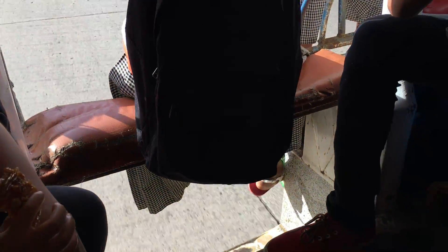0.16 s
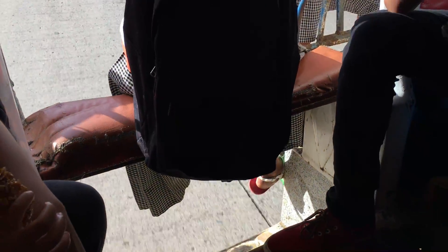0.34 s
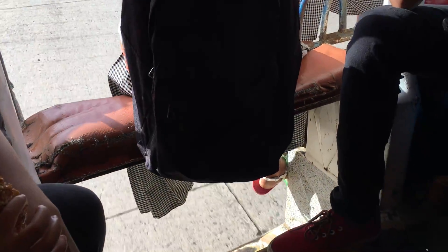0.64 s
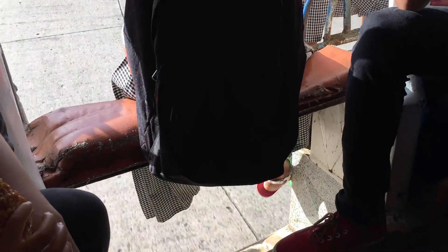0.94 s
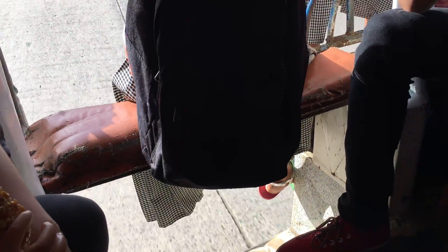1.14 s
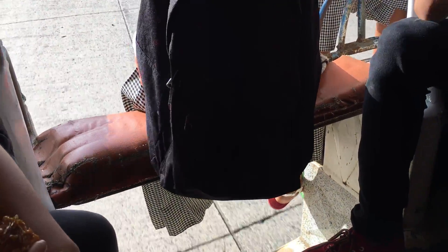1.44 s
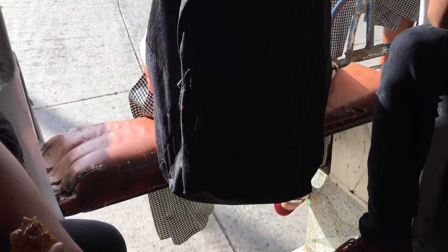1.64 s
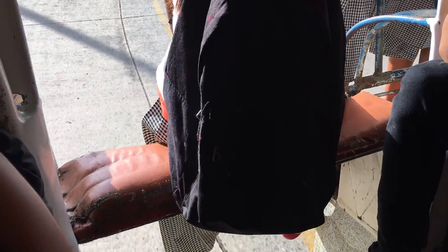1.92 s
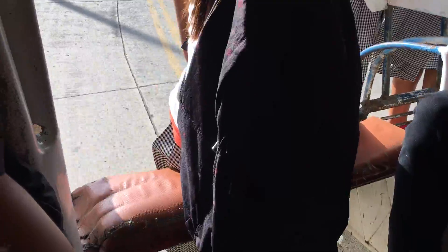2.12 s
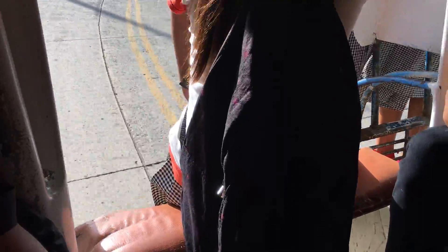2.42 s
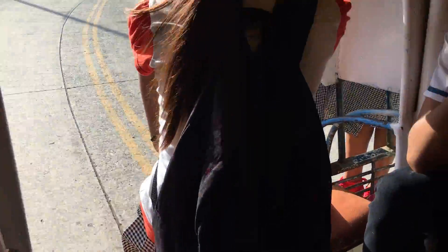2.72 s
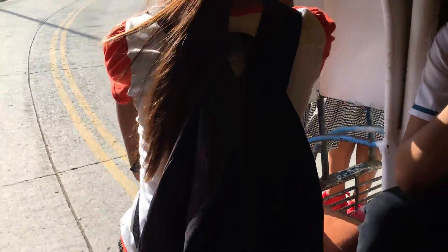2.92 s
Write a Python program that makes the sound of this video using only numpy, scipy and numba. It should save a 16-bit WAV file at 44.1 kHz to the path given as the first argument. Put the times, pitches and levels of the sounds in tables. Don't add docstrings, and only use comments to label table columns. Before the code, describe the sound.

A diesel bus engine holds constant speed, heard inside the open-sided cabin: a deep, wavering drone near 59 Hz over low tyre and air rush. Until 1.6 s knock is soft, with faint ticks and tiny dry seat-frame squeaks, clearest at 0.7 and 0.83 s. Floor thuds come around 1.6-1.75 s, then load brings loud, rapid metallic knocking, strongest 1.9-2.4 s, easing around 2.7 s but continuing to the end at 3.07 s.

```python
import sys
import numpy as np
from scipy import signal
from scipy.fft import rfft, irfft, next_fast_len
from scipy.io import wavfile
from scipy.ndimage import uniform_filter1d
from numba import njit

SR = 44100
rng = np.random.default_rng(int(sys.argv[2]) if len(sys.argv) > 2 else 0)


def magnitude_from_level(level_db):
    exponent = np.asarray(level_db, float) / 20
    return 10 ** exponent


def persist_wave(psi):
    counts = np.round(np.clip(psi, -1, 1) * 32767).astype(np.int16)
    wavfile.write(sys.argv[1], SR, np.atleast_2d(counts).T)


N = 135387

CYCLE_HZ, FIRST_FIRES_S = 14.66, 2.2185
FULL_LOAD_DB = -30

# t/s, firing-tone boom level/dB, engine load as knock level/dB
DRIVE = [(0, -25.5, -40), (.1, -20.5, -41), (.25, -12.5, -51), (.44, -19, -42.5), (0.629, -11.5, -53),
         (0.779, -15, -54), (1.14, -16, -41.5), (1.29, -19, -41), (1.37, -15, -41), (1.68, -22.5, -35),
         (1.8, -18, -33), (1.93, -9.5, -30), (2.08, -12, -30.5), (2.298, -12, -31), (2.55, -14.5, -32.5),
         (2.7, -19.5, -36), (2.85, -17, -36), (3.07, -12.5, -32.5)]
# multiple of the cycle, level at full load/dB, share of load change
ENGINE_ORDERS = [(6, -28.5, 2.4), (8, -17.5, 1.21), (10, -26.5, 1.66), (12, -29, 1.4), (14, -38, 1.87),
                 (20, -50.5, 2.7)]
CYLINDER_DB = [0, -2, -2, -5.5]
# t/s, extra level/dB
ODD_FIRINGS = [(1.885, -1.5), (1.953, 2), (2.09, -0.5), (2.158, -1), (2.293, 2.5), (2.361, 2), (2.497, -1),
               (2.702, 3), (2.77, 1), (2.838, -3.5), (2.94, 1.5), (3.043, 2)]
# f/Hz, width/Hz, level/dB
BLOCK_MODES = [(695.7, 20, 2.5), (994, 52, -3.5), (1121, 15, 0), (1621, 104, -5), (1917, 63, -3.5),
               (2278, 8.1, -1), (2475, 59, -11.5), (2787, 69, -9.5), (3232, 172, -12), (3585, 34, -10),
               (4520, 120, -19.5)]
# f/Hz, level/dB
KNOCK_COLOUR = [(300, -33), (560, -16), (700, -9), (1010, 1), (1380, -7.5), (3000, -13.5), (5000, -20.5),
                (9000, -35), (16000, -54)]
# t/s, level/dB
SHAKE = [(0, -34), (.3, -31.5), (.7, -39), (1.05, -29.5), (1.349, -25.5), (1.6, -29), (1.9, -23.5),
         (2.1, -26.5), (2.599, -37), (3.07, -30.5)]
# f/Hz, width/Hz, level/dB
FLOOR_PANELS = [(47.9, 9.3, 4), (68, 56.7, 7), (113, 39, -5.5), (146, 52, -12.5), (275.5, 160, -11.5)]
PANEL_FOLLOW = [1.3, 0.13, 0.56, 0.084, 0.98]
# f/Hz, level/dB
ROAD_COLOUR = [(110, -47), (210, 0.5), (355, -2), (560, -7), (2600, -18), (4560, -30), (10400, -43),
               (16000, -37)]
# t/s, length/s, level/dB, stick-slip f/Hz, tone share/0-1
SQUEAKS = [(.003, 0.01, -66, 3100, .2), (.049, 0.011, -53.5, 3000, 0.3), (.2935, 0.012, -47, 3670, 0.2),
           (0.322, 0.021, -56.5, 3840, .3), (0.34, 0.026, -49, 3800, 0.3), (0.376, 0.03, -52.5, 3750, .1),
           (0.458, .01, -59.5, 3840, 0.1), (0.525, .03, -66, 3970, 0.4), (0.687, 0.014, -52, 2820, 0.3),
           (.7015, 0.0087, -40.5, 3750, 0.83), (0.709, .014, -47, 3860, .4),
           (0.8243, 0.008, -40.5, 3810, 0.8), (0.833, 0.03, -48.5, 3580, 0.1),
           (1.034, 0.014, -52.5, 2920, .05), (1.219, 0.012, -50.5, 3170, 0.05),
           (1.444, 0.01, -52.5, 1980, .05), (1.478, 0.043, -53.5, 2090, 0.05),
           (1.537, 0.012, -56, 4120, 0.5), (1.542, .01, -58, 4000, .05)]
SQUEAK_PARTIALS_DB = [-8, -14, 0, -4]
RASP_HZ = [4400, 5500, 6700, 9000, 9800, 11400, 13000, 15200]
# t/s, length/s, f/Hz, level/dB
JOINTS = [
    (0.143, .06, 190, -39),
    (0.265, .08, 320, -40.5),
    (0.382, .08, 138, -34),
    (0.524, .1, 328, -40.5),
    (1.268, 0.13, 261, -35.5),
    (1.58, 0.045, 127.6, -27),
    (1.72, 0.056, 55.4, -24),
    (1.7, .14, 330, -38.5),
    (1.736, .1, 453, -42),
    (2.05, 0.05, 293, -36),
]
# t/s, length/s, f/Hz, level/dB
FRAME_RINGS = [(0.292, 0.008, 5230.0, -59.0), (0.292, 0.008, 7260, -57), (0.356, 0.006, 6500.0, -62.0),
               (0.701, 0.01, 7410.0, -60), (0.701, 0.016, 4520.0, -59.0), (0.705, 0.0087, 3830, -49),
               (0.705, 0.012, 7060.0, -62.0), (0.711, 0.008, 5710.0, -62.0), (0.827, 0.015, 3800, -46.5),
               (0.828, 0.016, 3480, -47), (0.833, 0.009, 7030, -45), (0.843, 0.006, 5810.0, -54),
               (0.846, 0.01, 5230.0, -61), (1.035, 0.012, 5460, -58), (1.041, 0.008, 6740.0, -63.0),
               (1.042, 0.008, 9000, -65), (1.224, 0.006, 9490, -60), (1.219, 0.007, 2610, -45),
               (1.23, 0.0046, 2700, -47), (1.45, 0.006, 7060.0, -60), (1.475, 0.01, 6240.0, -59),
               (1.502, 0.008, 6240.0, -61.0)]
# t/s, length/s, f/Hz, level/dB
PANEL_RINGS = [(1.741, 0.008, 4130.0, -51.0), (1.809, 0.008, 6160.0, -58.0), (1.845, 0.011, 1024, -26),
               (1.941, 0.0087, 3230, -36), (1.981, 0.008, 990.0, -27), (2.012, 0.013, 2290, -33),
               (2.014, 0.0071, 7360.0, -52), (2.016, 0.0071, 985, -33.0), (2.147, 0.008, 3230.0, -35),
               (2.166, 0.009, 3250, -39), (2.218, 0.0084, 1000, -31), (2.216, 0.01, 1585, -28),
               (2.251, 0.006, 3250.0, -36.5), (2.286, 0.0065, 4680, -46), (2.29, 0.008, 692, -28.5),
               (2.323, 0.006, 1953, -39), (2.357, 0.0089, 1516, -38), (2.362, 0.01, 3570.0, -43),
               (2.392, 0.012, 693, -38.5), (2.423, 0.01, 2930.0, -35.5), (2.425, 0.008, 980, -46),
               (2.455, 0.01, 2970, -41), (2.489, 0.006, 1980, -36), (2.488, 0.015, 3590, -40.5),
               (2.557, 0.0083, 1620, -38.0), (2.555, 0.01, 3200, -44.0), (2.661, 0.007, 993, -37),
               (2.696, 0.0047, 1002, -32), (2.761, 0.0073, 3250, -41), (2.797, 0.008, 1980.0, -38.5),
               (2.798, 0.007, 990, -39), (2.866, 0.01, 1890, -42), (2.92, 0.027, 2500, -40.5),
               (2.931, 0.01, 4610.0, -50), (2.93, 0.013, 1915, -36.5), (2.964, 0.01, 4690.0, -51),
               (2.965, 0.011, 3250.0, -41), (3.033, 0.008, 3226, -41), (3.036, 0.008, 4040, -45)]


def level(x, db):
    return x * magnitude_from_level(db) / np.sqrt(np.mean(x ** 2))


@njit
def svf(x, hz, width):
    y, band, low = np.empty(len(x)), 0., 0.
    g, k = np.tan(np.pi * hz / SR), width / hz
    for i in range(len(x)):
        v = (band + g * (x[i] - low)) / (1 + g * (g + k))
        band = 2 * v - band
        low = low + 2 * g * v
        y[i] = k * v
    return y


def band_noise(hz, width):
    return svf(rng.standard_normal(N), float(hz), float(width))


def walk(rate):
    hold = int(SR / rate)
    steps = np.repeat(rng.standard_normal(N // hold + 1), hold)[:N]
    return 1.5 * uniform_filter1d(uniform_filter1d(steps, hold), hold)


def colour(x, points):
    hz, db = np.array(points, float).T
    n = next_fast_len(N)
    f = np.maximum(np.arange(n // 2 + 1) * SR / n, 1)
    gain = magnitude_from_level(np.interp(np.log(f), np.log(hz), db))
    return irfft(rfft(x, n) * gain, n)[:N]


def boom(cycle, boom_db, load_db):
    pulse_lag_s, pulse_skew, phase_wobble = .0056, -.6, .22
    turn = 2 * np.pi * (cycle - pulse_lag_s * CYCLE_HZ)
    firing_gain = magnitude_from_level(boom_db + 1.4 * walk(18))
    out = firing_gain * np.cos(4 * turn + pulse_skew + phase_wobble * walk(14))
    light_load_db = .8 * np.minimum(load_db + 38, 0)
    for order, db, follow in ENGINE_ORDERS:
        order_db = db + follow * (load_db - FULL_LOAD_DB) + light_load_db
        gain = magnitude_from_level(order_db + 1.2 * walk(25.04))
        out += gain * np.cos(round(order) * turn + pulse_skew + phase_wobble * walk(15))
    return -np.sqrt(2) * out


def knock(cycle, load_db):
    lead_s, late_s, t60_s, crack_s = .003, .002, .22, .0045
    scatter_db, patch_db, crack_db, clatter_db = 1.24, 3.4, 2.5, -11
    knock_db, ring_db = -2.5, 2.5
    load = load_db - FULL_LOAD_DB
    common_db = scatter_db * rng.standard_normal(300)
    for s, db in ODD_FIRINGS:
        common_db[int(np.floor(4 * (s - FIRST_FIRES_S) * CYCLE_HZ))] = db

    def part(hz, width):
        turns = 4 * (cycle + (lead_s - late_s * rng.random()) * CYCLE_HZ)
        firing = np.floor(turns).astype(int)
        firing_db = common_db + patch_db * rng.standard_normal(300)
        size_db = np.array(CYLINDER_DB)[firing % 4] + firing_db[firing]
        age = (turns - firing) / (4 * CYCLE_HZ)
        fading = magnitude_from_level(size_db - 60 * age / t60_s + crack_db * np.exp(-age / crack_s))
        burst = np.hypot(fading, magnitude_from_level(clatter_db)) * rng.standard_normal(N)
        follow = 1.47 + .2 * np.log2(hz / 1000)
        return level(svf(burst, float(hz), float(width)), 0) * magnitude_from_level(follow * load)

    third_octaves = 400 * 2 ** np.arange(0, 5.5, 1 / 3)
    broad = sum(np.sqrt(hz / 1000) * part(hz, hz / 4) for hz in third_octaves)
    ring = sum(magnitude_from_level(db) * np.sqrt(width / 100) * part(hz, width) for hz, width, db in BLOCK_MODES)
    return magnitude_from_level(knock_db + FULL_LOAD_DB - 4) * (colour(broad, KNOCK_COLOUR) + magnitude_from_level(ring_db) * ring)


def floor_shake(shake_db):
    mean_db, out = -32, np.zeros(N)
    for (hz, width, db), follow in zip(FLOOR_PANELS, PANEL_FOLLOW):
        panel = svf(band_noise(hz, 1.23 * width), float(hz), 1.23 * width)
        out += level(panel, db + mean_db) * magnitude_from_level(follow * (shake_db - mean_db))
    return out


def road():
    rush, swell = np.zeros(N), walk(2.1)
    t = (np.arange(N) - N / 4) / SR
    for hz in 200 * 2 ** np.arange(0, 6.6, .5):
        fade_db = -1.5 * t * min(450 / hz, 1)
        db = .5 * swell + 1.6 * walk(8.95) + fade_db
        rush += magnitude_from_level(db) * band_noise(hz, hz / 2)
    whirr = magnitude_from_level(3.5 * walk(25)) * band_noise(2580, 200)
    return level(colour(rush, ROAD_COLOUR), -39.5) + level(whirr, -57)


def fittings():
    ticks_per_s, tick_db, scatter_db, decay_s, tick_hz = 30, -72, 4, .003, 7000
    struck = rng.random(N) < ticks_per_s / SR
    hits = struck * magnitude_from_level(tick_db + scatter_db * rng.exponential(size=N))
    env = signal.lfilter([1], [1, -np.exp(-1 / (decay_s * SR))], hits)
    return env * level(band_noise(tick_hz, tick_hz), 0)


def squeaks(t):
    attack_s, tail_s, wobble, fade_db = .0006, .003, .009, 8
    out, waver = np.zeros(N), walk(600)
    flutter = [magnitude_from_level(3.5 * walk(250)) for _ in SQUEAK_PARTIALS_DB]
    frame = np.array([level(band_noise(hz, 900), -5.5 * np.log2(hz / 8000)) for hz in RASP_HZ])
    rasp_mixes = magnitude_from_level(2 * rng.standard_normal((len(SQUEAKS), len(RASP_HZ))))
    for (t0, length, db, hz, share), rasp_mix in zip(SQUEAKS, rasp_mixes):
        i = slice(int(t0 * SR), int((t0 + length + .07) * SR))
        age = t[i] - t0
        share = np.clip(share, 0, 1)
        env = np.clip(age / attack_s, 0, 1) * np.exp(-np.maximum(age - length, 0) / tail_s)
        phase = 2 * np.pi * np.cumsum(hz * (1 + wobble * waver[i])) / SR
        stack = sum(magnitude_from_level(p) * flutter[k][i] * np.sin((k + 1) * phase)
                    for k, p in enumerate(SQUEAK_PARTIALS_DB))
        rasp = rasp_mix @ frame[:, i] / np.linalg.norm(rasp_mix)
        gain = magnitude_from_level(db - fade_db * np.clip(age / length, 0, 1)) * env
        out[i] += gain * (np.sqrt(share) * stack + np.sqrt(1 - share) * rasp)
    return out


def joints(t):
    q, edge_s = 4.8, .025
    out = np.zeros(N)
    for t0, length, hz, db in JOINTS:
        env = np.clip(np.minimum(t - t0, t0 + length - t) / edge_s + 1, 0, 1)
        hum = env * svf(band_noise(hz, hz / q), float(hz), hz / q)
        out += level(hum, db + 10 * np.log10(np.mean(env ** 2)))
    return out


def rings(t, table):
    attack_s, tail_s, wobble = .0015, .0035, .011
    out, waver, flutter = np.zeros(N), walk(600), magnitude_from_level(2.2 * walk(400))
    for t0, length, hz, db in table:
        i = slice(int(t0 * SR), int((t0 + length + .04) * SR))
        age = t[i] - t0
        env = np.clip(age / attack_s, 0, 1) * np.exp(-np.maximum(age - length, 0) / tail_s)
        phase = 2 * np.pi * np.cumsum(hz * (1 + wobble * waver[i])) / SR
        out[i] += np.sqrt(2) * magnitude_from_level(db) * env * flutter[i] * np.sin(phase)
    return out


def scene():
    t = np.arange(N) / SR
    drive_t, drive_boom, drive_load = np.array(DRIVE, float).T
    boom_db = np.interp(t, drive_t, drive_boom)
    load_db = np.interp(t, drive_t, drive_load)
    shake_db = np.interp(t, *np.array(SHAKE, float).T)
    cycle = (t - FIRST_FIRES_S) * CYCLE_HZ
    engine = boom(cycle, boom_db, load_db) + knock(cycle, load_db)
    ride = floor_shake(shake_db) + road() + fittings()
    body = squeaks(t) + joints(t) + rings(t, FRAME_RINGS) + rings(t, PANEL_RINGS)
    return (engine + ride + body)[None]


def band_limit(x):
    return signal.sosfilt(signal.butter(12, 15830, fs=SR, output="sos"), x)


def record(dry):
    ceiling = .74
    bass_cut = signal.sosfilt(signal.butter(2, 32, "high", fs=SR, output="sos"), dry)
    limited = ceiling * np.cbrt(np.tanh((bass_cut / ceiling) ** 3))
    return band_limit(limited)


dry = scene()
out = record(dry)
persist_wave(out)
```